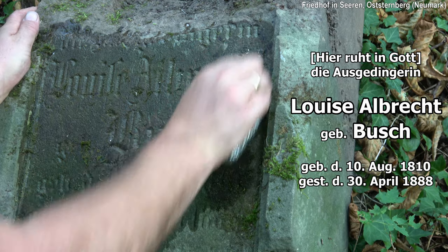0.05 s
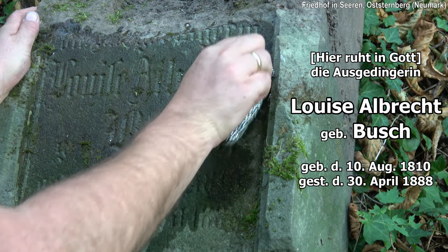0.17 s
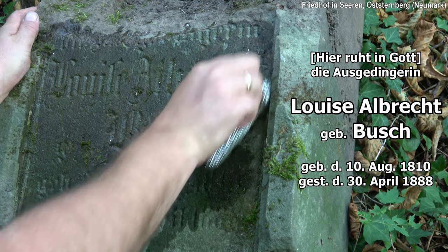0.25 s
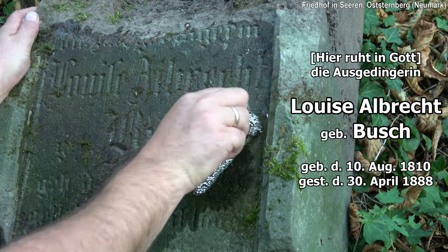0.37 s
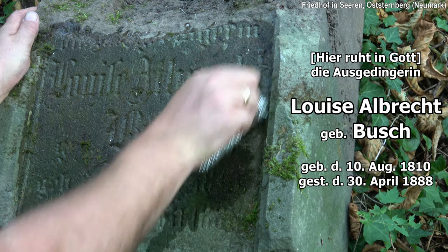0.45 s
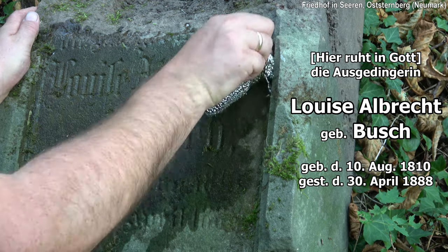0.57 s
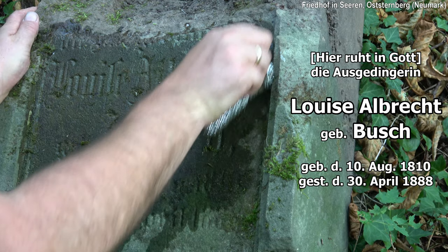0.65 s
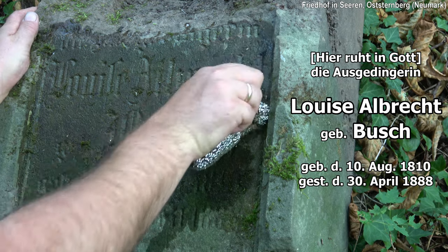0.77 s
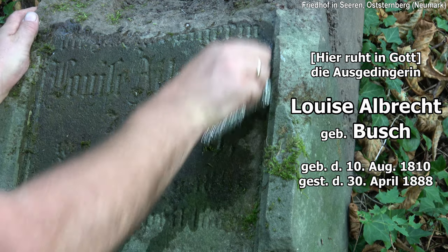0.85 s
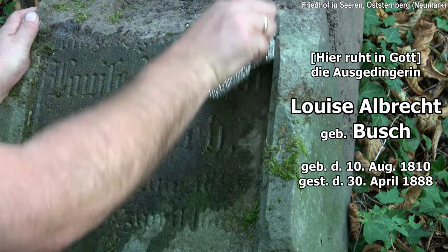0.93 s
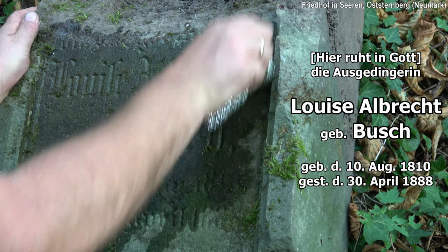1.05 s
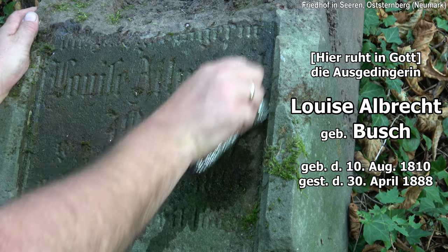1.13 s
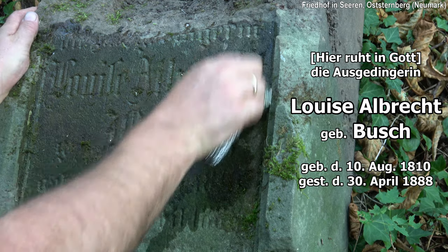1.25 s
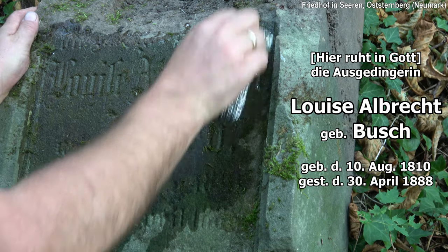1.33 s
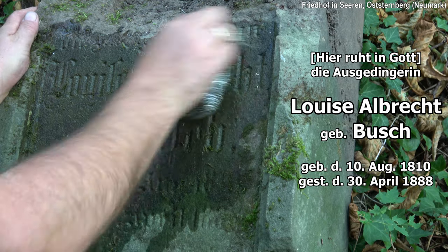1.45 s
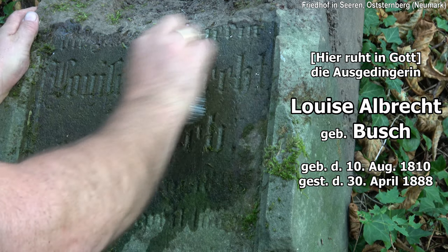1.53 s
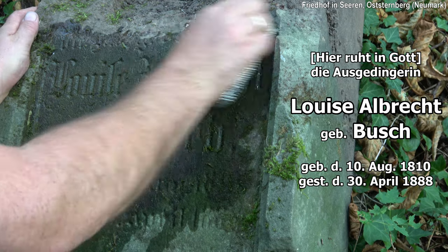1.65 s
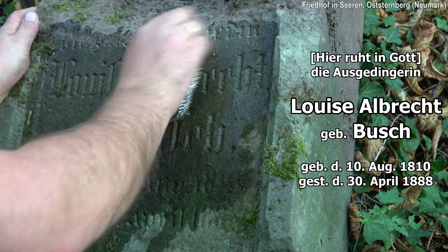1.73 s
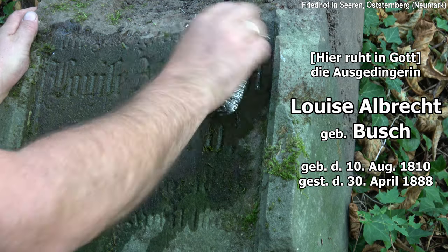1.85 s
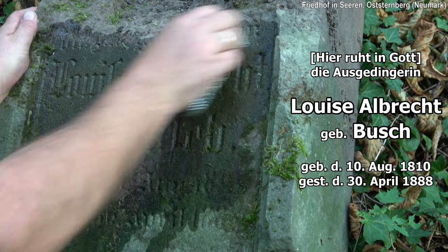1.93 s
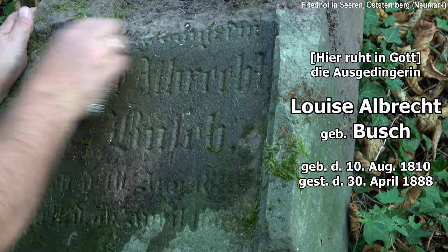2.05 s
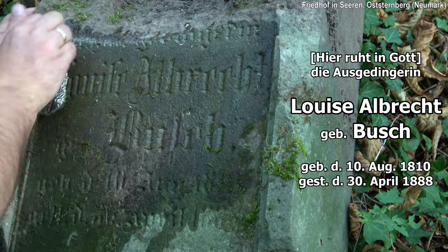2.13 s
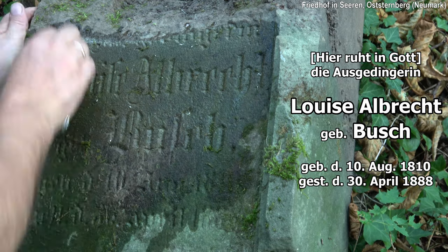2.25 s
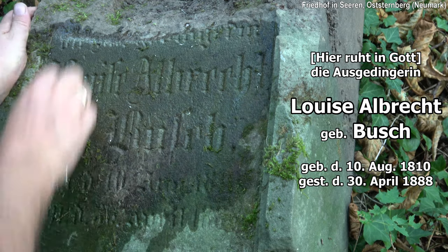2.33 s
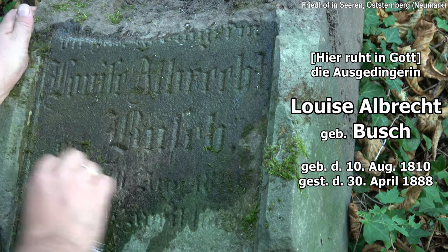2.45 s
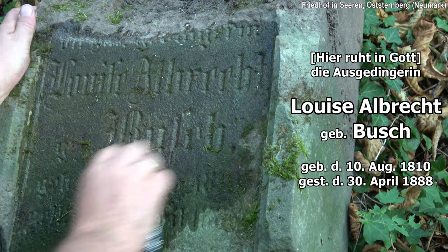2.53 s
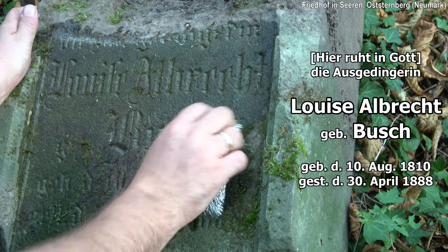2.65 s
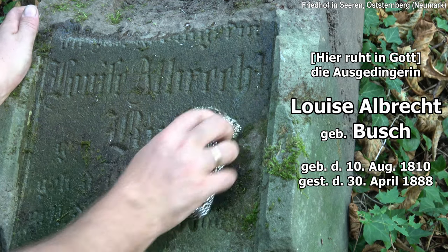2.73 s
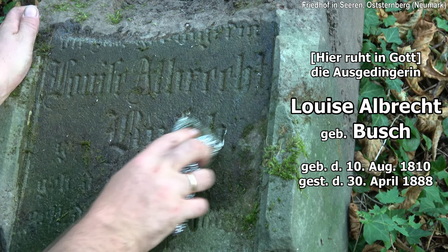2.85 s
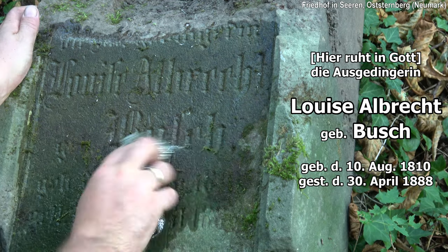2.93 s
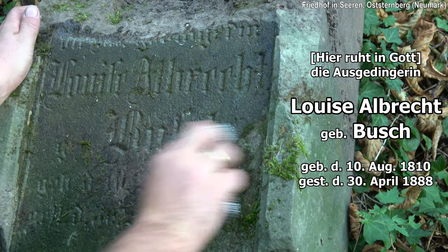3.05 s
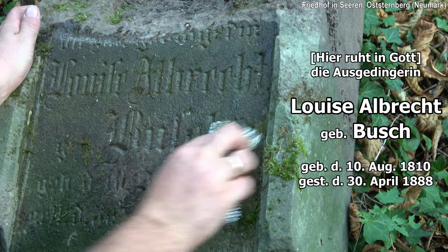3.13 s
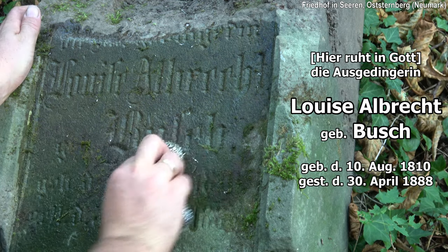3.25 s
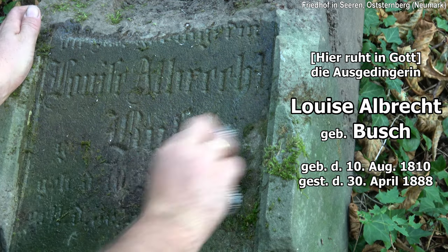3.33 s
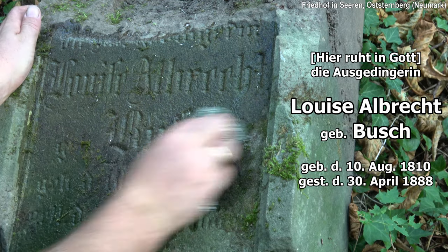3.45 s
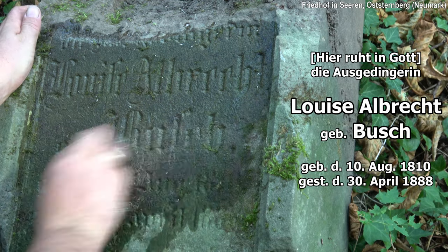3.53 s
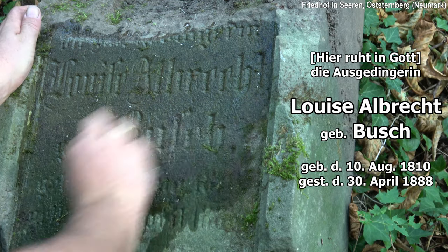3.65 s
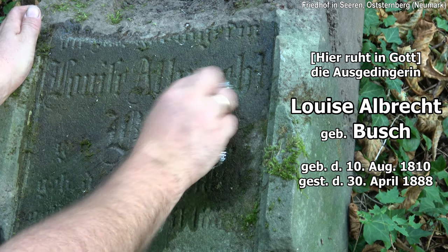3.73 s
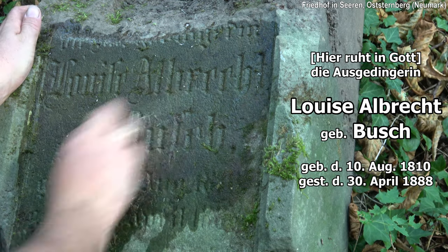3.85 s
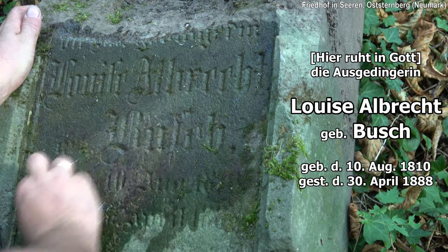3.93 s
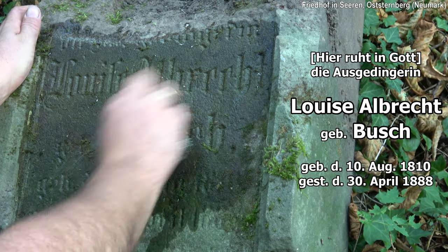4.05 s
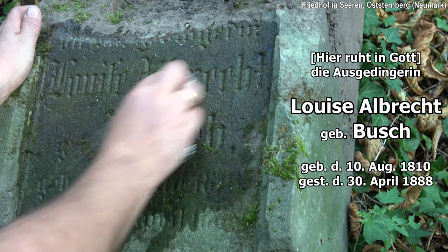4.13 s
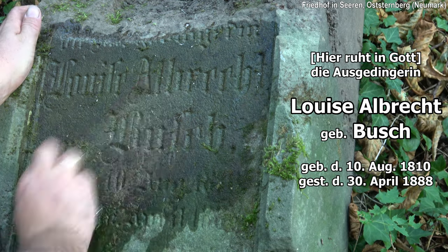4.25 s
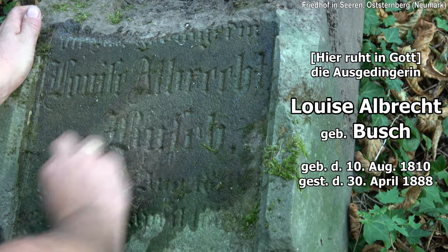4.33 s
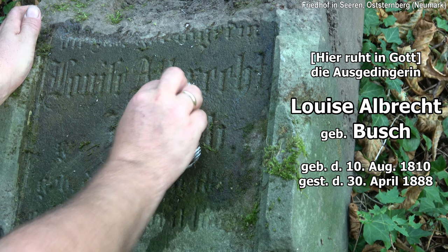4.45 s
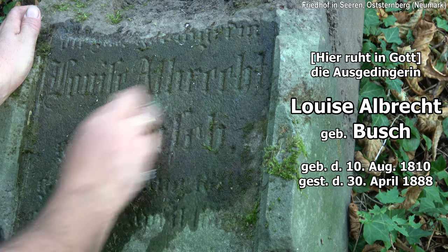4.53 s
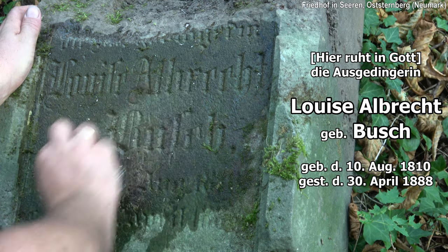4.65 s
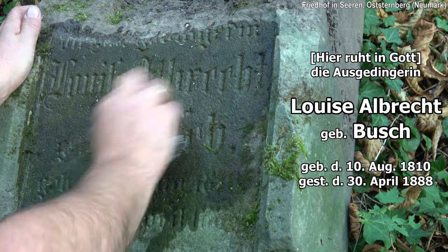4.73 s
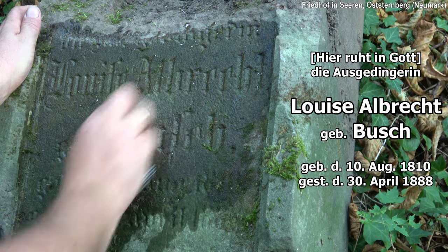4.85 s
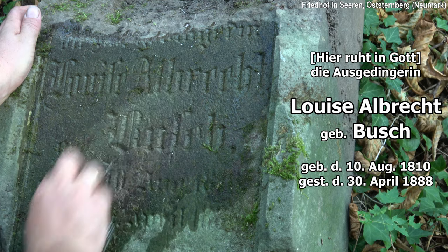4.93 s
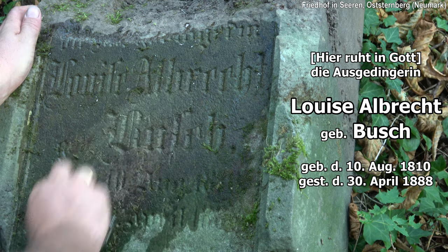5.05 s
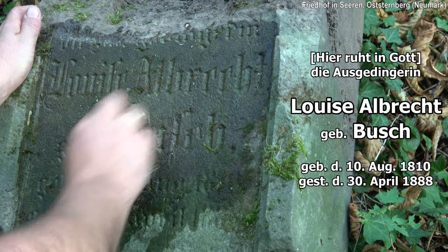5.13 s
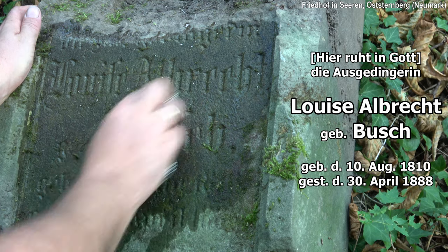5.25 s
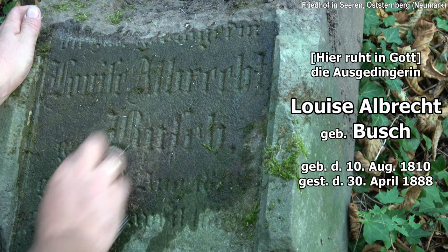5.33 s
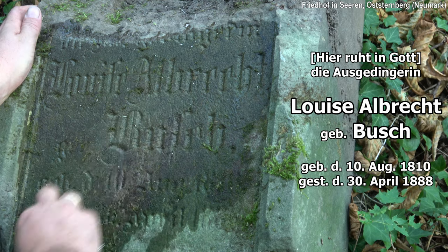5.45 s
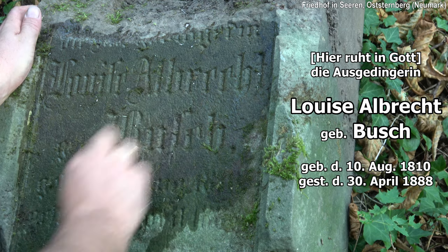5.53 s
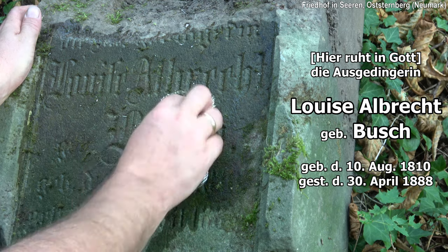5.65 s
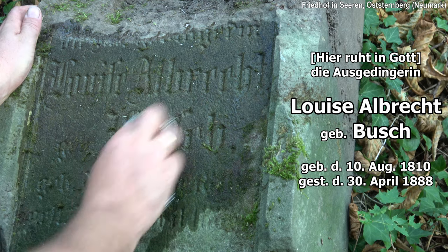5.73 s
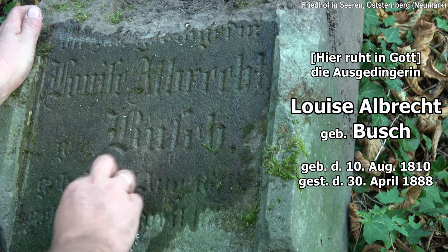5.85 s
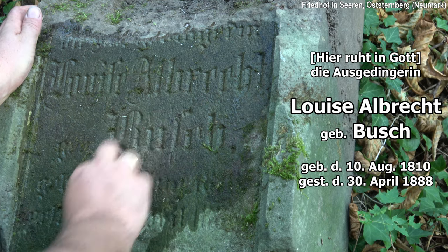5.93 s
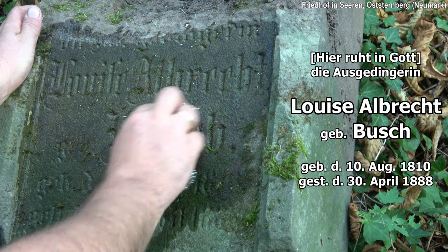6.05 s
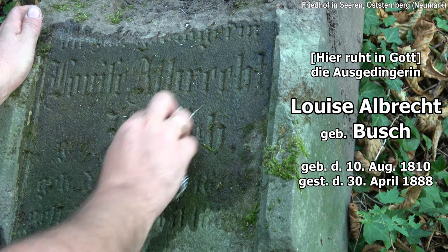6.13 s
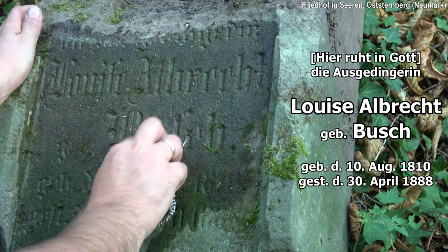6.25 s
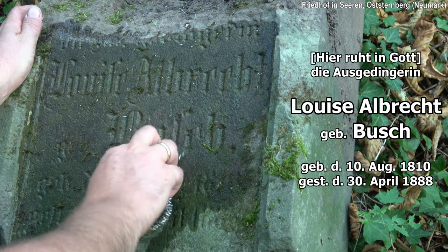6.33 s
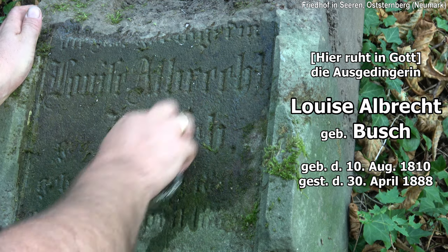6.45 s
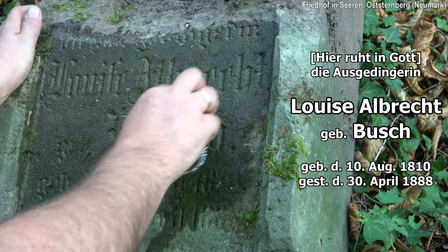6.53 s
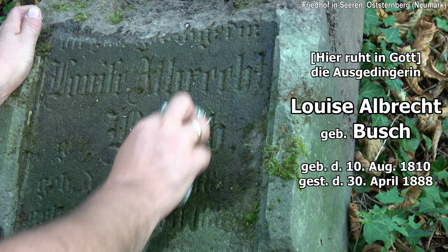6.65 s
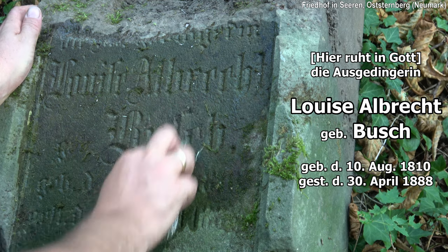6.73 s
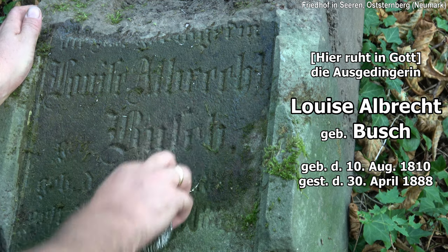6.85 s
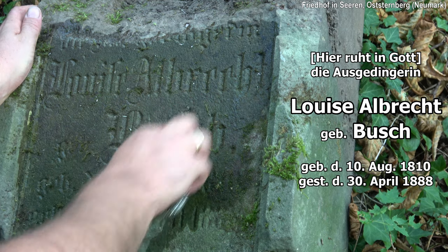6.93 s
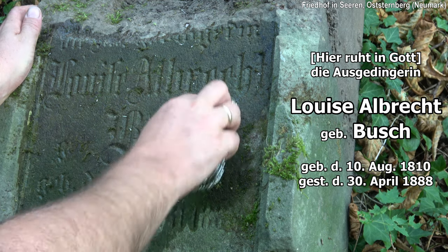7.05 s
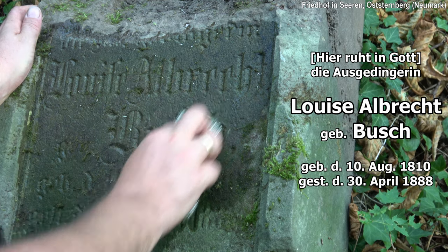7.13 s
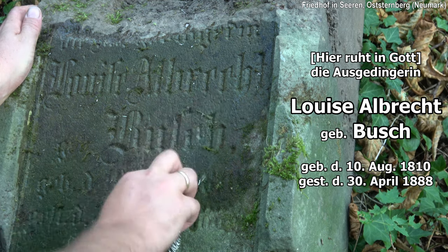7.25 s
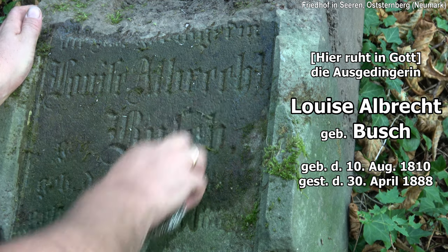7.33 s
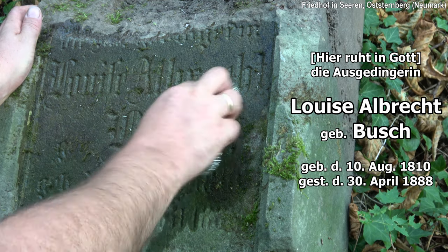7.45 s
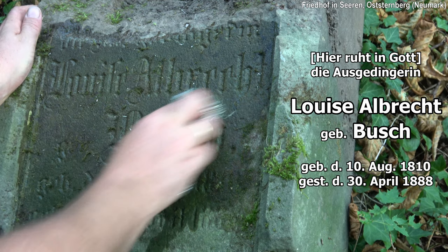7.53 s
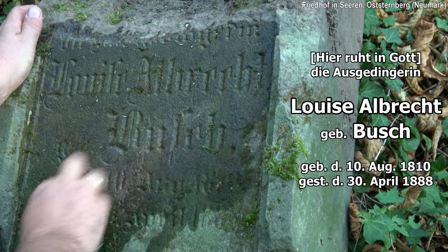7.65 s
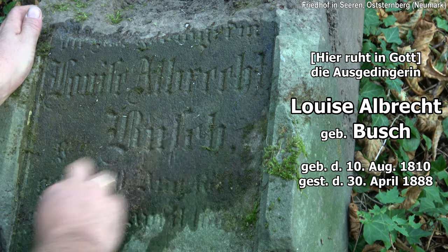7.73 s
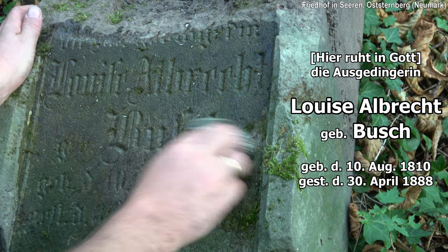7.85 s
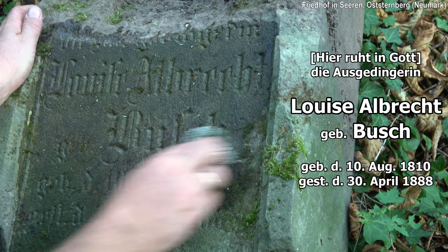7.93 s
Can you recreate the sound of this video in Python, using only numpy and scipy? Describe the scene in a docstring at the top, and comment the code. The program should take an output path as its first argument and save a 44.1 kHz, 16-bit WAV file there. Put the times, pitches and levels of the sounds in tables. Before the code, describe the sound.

A mesh pad scrubs rough stone in quick rasping strokes, then slower single ones, over a faint outdoor rumble and whirr.

```python
"""Scrubbing a stone slab

A hand scrubs a mossy slab with a mesh pad, close by, on a still day outdoors. Countless strands
catch and slip on the grit, making a rasp; a few snap free with a tick. Quick strokes come first,
a pause with a soft bump, more quick strokes, then slow single ones. Two faint whistles rise,
and a steady whirr and a low rumble lie under it all."""
import sys
import numpy as np
from scipy import signal
from scipy.fft import rfft, irfft
from scipy.io import wavfile
from scipy.ndimage import uniform_filter1d

SR = 44100
rng = np.random.default_rng(int(sys.argv[2]) if len(sys.argv) > 2 else 0)


def store_wav(level_fs):
    """Save 16-bit WAV to argv[1]."""
    pcm = np.round(np.clip(np.atleast_2d(level_fs), -1, 1) * 32767)
    wavfile.write(sys.argv[1], SR, pcm.T.astype(np.int16))


N = 351918
TIME = np.arange(N) / SR

# The tone of strands slipping on grit: pitch_hz, level_db
RASP_TONE = [(100, -38), (250, -24.5), (430, -17.5), (600, -10), (850, -6), (1400, 1), (2100, -1.64),
             (3700, -0.25), (4900, -2), (6900, -1.34), (9500, -4), (12000, -7.5), (14000, -10.5),
             (15600, -16.5)]
# Strokes of the pad: start_s, length_s, speed_up_s, slow_down_s, level_db,
# brightness_db_per_octave, palm_hollow_db, hand_shadow_db, bounce_delay_ms
PAD_STROKES = [(0.008, 0.15, 0.064, 0.056, -29, -1.6, -3, 1.5, 0.81),
               (0.146, 0.26, 0.14, 0.08, -35.0, -1.4, -0.5, 2.5, 0.38),
               (0.415, 0.2, 0.086, 0.093, -30, -0.6, -3, 2, 1.45),
               (0.614, 0.19, 0.11, 0.094, -32, -0.6, -2.5, -0.1, 1.5),
               (0.81, 0.18, 0.082, 0.077, -30.5, -0.7, -2.0, 0.7, 0.34),
               (0.994, 0.25, 0.09, 0.1, -33, -0.8, -1.4, 0.9, 0.38),
               (1.413, 0.13, 0.074, 0.044, -27.5, 0.5, 2, 2.6, 0.62),
               (1.534, 0.12, 0.057, 0.048, -29, -0.1, 2.1, 4, 1.8),
               (1.648, 0.15, 0.058, 0.055, -28, -0.1, 2, 2.5, 0.31),
               (1.783, 0.12, 0.047, 0.045, -31.5, 0.8, 4.5, 2, 2.5),
               (1.891, 0.27, 0.088, 0.041, -28, 0.4, 5.1, 2.5, 0.29),
               (2.719, 0.3, 0.32, 0.074, -31, 1.2, 1, 1.5, 1.27),
               (2.986, 0.16, 0.064, 0.059, -30.5, 1.8, 5, 1, 0.43),
               (3.133, 0.17, 0.092, 0.081, -29.7, -0.5, 2.5, 2, 0.4),
               (3.279, 0.16, 0.08, 0.073, -31, 0.2, 1, 2, 1.33),
               (3.43, 0.2, 0.074, 0.086, -26, 0.4, 0.7, -0.6, 0.99),
               (3.61, 0.18, 0.072, 0.057, -27.9, 0.4, 2, 2.5, 0.37),
               (3.784, 0.19, 0.048, 0.078, -26.5, -0.5, -2.7, 1.3, 0.56),
               (3.949, 0.19, 0.084, 0.047, -29.5, 0, -0.5, 2.5, 2.1),
               (4.134, 0.2, 0.068, 0.077, -27.5, -0.56, -3.5, 1.5, 2.8),
               (4.303, 0.19, 0.079, 0.058, -28, 0, 1.5, 2, 0.39),
               (4.49, 0.17, 0.078, 0.055, -27, 0, -1.3, 0.7, 1.55),
               (4.642, 0.17, 0.092, 0.047, -28, -0.3, 0.2, 1, 0.4),
               (4.804, 0.27, 0.066, 0.16, -28, -1.0, -3, 0.1, 0.48),
               (5.253, 0.245, 0.056, 0.16, -29, -0.2, -2.2, 0, 2.2),
               (5.686, 0.27, 0.049, 0.2, -31, -0.7, -1, 3.5, 1.13),
               (6.108, 0.23, 0.13, 0.097, -37.5, -0.6, 1.5, 5.5, 1.16),
               (6.219, 0.24, 0.1, 0.071, -41.5, 0, -2, 6, 0.41),
               (6.601, 0.33, 0.13, 0.23, -32.5, -0.1, 2.8, 8, 0.43),
               (7.102, 0.28, 0.069, 0.26, -31.5, 0.2, 2, 7.5, 0.44),
               (7.516, 0.231, 0.061, 0.142, -27.5, 0.26, -3, 4, 0.69),
               (7.918, 0.24, 0.057, 0.14, -28.5, -0.5, 0.5, 0, 1)]


def gain_of(db):
    """Turns decibels into a number to multiply by."""
    return 10 ** (np.asarray(db) / 20)


def evened(x):
    """Scales a signal to an average power of 1."""
    return x / np.sqrt(np.mean(x ** 2) + 1e-20)


def read(points, hz):
    """Reads between a table's points, on a scale of octaves."""
    pitch_hz, value = np.transpose(points)
    return np.interp(np.log(hz + 1), np.log(pitch_hz + 1), value)


def coloured(x, db_at):
    """Filters x by a rule that gives dB for each frequency."""
    return irfft(rfft(x) * gain_of(db_at(np.fft.rfftfreq(N, 1 / SR))), N)


def wander(rate_hz):
    """A smooth random wobble of size 1, mostly slower than the rate."""
    return evened(coloured(rng.standard_normal(N), lambda hz: -10 * np.log10(1 + (hz / rate_hz) ** 4)))


def hump(hz, centre_hz, octaves):
    """A bell shape of height 1 around one pitch."""
    return np.exp(-(np.log2((hz + 1) / centre_hz) / octaves) ** 2)


def add(mix, start_s, sound):
    """Mixes a sound in at the given time."""
    part = mix[max(round(start_s * SR), 0):][:len(sound)]
    part += sound[:len(part)]


def arm_swing(start, length, rise_s, fall_s):
    """One move of the arm, from 0 to 1: it speeds up, then slows to a stop."""
    up = np.clip((TIME - start) / rise_s, 0, 1)
    down = np.clip((start + length - TIME) / fall_s, 0, 1)
    return (np.sin(np.pi / 2 * up) * np.sin(np.pi / 2 * down)) ** 2


def rub_strength(sag_db=1.0, drag_db=-28.5, fade_db_per_s=500):
    """Pressure eases through each stroke, and the mesh drags faintly as the hand turns round."""
    # Light touches as the pad is shifted or set down: start_s, length_s, level_db
    brushes = [(0, 0.031, -50), (1.214, 0.067, -53.4), (2.132, 0.088, -50), (2.188, 0.083, -44.5),
               (2.469, 0.13, -50.4), (2.632, 0.088, -54.5), (5.037, 0.075, -51), (5.188, 0.06, -50.5),
               (5.467, 0.054, -50.5), (5.638, 0.042, -55), (5.922, 0.047, -56.1), (7.876, 0.04, -56)]
    power = np.zeros(N)
    for start, length, rise_s, fall_s, db, *_ in PAD_STROKES:
        inside = np.clip(TIME, start, start + length)
        run = arm_swing(start, length, rise_s, fall_s) * gain_of(db - sag_db * (inside - start) / length)
        drag = gain_of(db + drag_db - np.minimum(fade_db_per_s * abs(TIME - inside), 80))
        power += run ** 2 + drag ** 2
    for start, length, db in brushes:
        power += (gain_of(db) * arm_swing(start, length, length / 2, length / 2)) ** 2
    return np.sqrt(power)


def slips(speed, slow_per_s=6000, extra_per_s=50000, spread_db=0.3):
    """Strands make tiny, uneven slips; the faster the pad runs, the denser the hiss."""
    chance = np.clip((slow_per_s + extra_per_s * speed) / SR, 1e-3, 1)
    size = rng.standard_normal(N) * gain_of(spread_db * np.minimum(rng.exponential(1, N), 4))
    return evened(size * (rng.random(N) < chance) / np.sqrt(chance))


def under_hand(x, speed, ease_db_per_octave_s=3.5, bite_db=1.5, patchy_db=1.7,
               bounce_share=0.26, bounce_dull_hz=4500, glide_per_s=0.14):
    """The palm, the mesh and a close echo shape the rasp, a little differently in each stroke."""
    # The hand shifts its hold and place: time_s, mesh_ring_db, shadow_hz, left_minus_right_db
    holds = [(0, 2.5, 4450, -1.9), (1.6, .8, 4750, 0.2), (2.05, -2.4, 4560, 0.1), (3.0, 1.5, 5100, -0.2),
             (3.8, -1.2, 4400, 1), (5.0, 0.5, 4750, 1.2), (6.2, 0.8, 4550, 0.2), (6.8, 1.5, 5040, -0.2),
             (7.98, .8, 5100, 0.8)]
    # Moments when the cupped hand rings: start_s, end_s, pitch_hz, width_octaves, boost_db
    cupped_rings = [(3.14, 3.294, 3660, 0.22, 5.5), (5.68, 6.5, 1810, .16, 2), (6.6, 7.4, 2420, .1, 4.5)]
    hz, t, slices = signal.stft(x, SR, nperseg=512, noverlap=384)
    hz = hz[:, None]
    start, length, _, _, _, *grip = np.transpose(PAD_STROKES)
    middle = start + length / 2
    stroke = np.argmin(abs(t[:, None] - middle) - length / 2, axis=1)  # nearest to each moment
    from_middle_s = t - middle[stroke]
    bright, hollow, shadow, delay_ms = (uniform_filter1d(column[stroke], size=15) for column in grip)
    hold_s, *hold = np.transpose(holds)
    mesh, shadow_hz, pan = (np.interp(t, hold_s, column) for column in hold)
    # a stroke starts dark and brightens as the pressure eases
    bright = bright + ease_db_per_octave_s * from_middle_s
    db = read(RASP_TONE, hz) + bright * np.log2(np.maximum(hz, 700) / 4000)
    db += hollow * hump(hz, centre_hz=1320, octaves=0.33)
    db += mesh * hump(hz, centre_hz=7400, octaves=0.59)
    db -= shadow * np.exp(-((hz - shadow_hz) / 880) ** 2)  # the hand blocks a band of treble
    # the middle of the rasp swells above 86% of full speed
    db += bite_db * (np.interp(t, TIME, speed) - 0.86) * hump(hz, centre_hz=2200, octaves=1.1)
    for begin, end, ring_hz, octaves, ring_db in cupped_rings:
        db += ring_db * hump(hz, ring_hz, octaves) * ((t > begin) & (t < end))
    # strands come into play and drop out in bunches
    bunches = uniform_filter1d(rng.standard_normal(db.shape), size=5, axis=0)
    db += patchy_db * evened(uniform_filter1d(bunches, size=12, axis=1))
    # sound bounces between hand and stone, on a path that changes as the hand travels
    delay_s = delay_ms / 1000 * (1 + glide_per_s * from_middle_s)
    bounce = bounce_share * np.exp(-hz / bounce_dull_hz - 2j * np.pi * hz * delay_s)
    colour = gain_of(db) / abs(1 - bounce)
    colour /= np.sqrt(np.mean(colour ** 2, axis=0))  # change the tone but keep the power
    slices = slices * colour * gain_of(np.array([pan, -pan]) / 2)[:, None]
    return evened(signal.istft(slices, SR, nperseg=512, noverlap=384)[1][:, :N])


def pad(boost_db=0.17, chatter_db=0.82):
    """The pad rasps over the stone and chatters across its grooves."""
    # Sound that reaches left and right by different paths: pitch_hz, level_against_direct_db
    scatter = [(700, -35.5), (1100, -30), (1700, -16), (3400, -77), (5000, -30), (8000, -21.5),
               (13000, -18)]
    strength = rub_strength()
    speed = np.sqrt(strength / strength.max())
    direct = slips(speed)
    scattered = coloured(rng.standard_normal(N), lambda hz: read(scatter, hz))
    rasp = under_hand(np.array([direct + scattered, direct - scattered]), speed)
    return rasp * strength * gain_of(boost_db + chatter_db * wander(rate_hz=70))


def background(air_db=-51, waver_db=0.45):
    """Low outdoor rumble, thin hiss and a steady whirr of three fuzzy tones."""
    # The tone of the outdoor air: pitch_hz, level_db
    air_tone = [(15, -40), (28, -9.5), (48, -5.5), (80, -2.5), (160, -14), (200, -14), (250, -14.5),
                (320, -13), (550, -2.5), (680, -6.5), (800, -3.5), (1080, -8), (1450, -20.5), (4000, -27),
                (10000, -29), (15600, -36)]
    # How alike the air sounds left and right: pitch_hz, likeness (0 to 1)
    air_likeness = [(60, 1), (200, 0.77), (640, 0.94), (3000, 0.95), (7000, 0.61), (15000, 0.38)]
    # The tones of the whirr: pitch_hz, width_hz, level_db
    whirr_tones = [(776, 79, -56), (927, 59, -67), (553, 130, -68)]
    hz = np.fft.rfftfreq(N, 1 / SR)
    left, other = rfft(rng.standard_normal((2, N)))
    alike = read(air_likeness, hz)
    right = alike * left + np.sqrt(1 - alike ** 2) * other
    air = irfft(np.array([left, right]) * gain_of(read(air_tone, hz)), N)
    whirr = np.zeros(N)
    for pitch_hz, width_hz, db in whirr_tones:
        phase = 2 * np.pi * pitch_hz * TIME
        fuzzy_tone = wander(width_hz / 2) * np.cos(phase) + wander(width_hz / 2) * np.sin(phase)
        whirr += gain_of(db) * evened(fuzzy_tone)
    return (gain_of(air_db) * evened(air) + whirr) * gain_of(waver_db * wander(rate_hz=23))


def whistles():
    """A thin tone slides upward and fades."""
    # Faint, high whistles: start_s, length_s, from_hz, to_hz, level_db
    slides = [(1.31, .12, 11300, 14100, -73), (7.83, .07, 11300, 14200, -76)]
    out = np.zeros(N)
    for start, length, from_hz, to_hz, db in slides:
        hz = np.linspace(from_hz, to_hz, int(length * SR))
        tone = np.sin(2 * np.pi * np.cumsum(hz) / SR)
        add(out, start, gain_of(db) * tone * signal.windows.tukey(len(hz), 0.5))
    return out


def bumps(rise_s=0.0046, dull_hz=420):
    """A soft blow swells and dies quickly, leaving a low murmur."""
    # Dull blows: start_s, level_db, pitch_hz, fade_s (time to fall by 60 dB)
    blows = [(2.201, -24, 268, 0.033), (2.2416, -37, 224, 0.05)]
    # The tones in each blow: pitch_multiple, boost_db, fade_multiple
    body_tones = [(1, 5.5, 0.77), (.75, -9, 2.8), (.45, -14, 3.5)]
    out, t = np.zeros(N), np.arange(SR // 4) / SR
    swell = 1 - np.exp(-(t / rise_s * 2) ** 2)
    for start, db, hz, fade_s in blows:
        ring = sum(gain_of(db + boost - 60 * t / (fade_s * longer)) * np.sin(2 * np.pi * hz * ratio * t)
                   for ratio, boost, longer in body_tones)
        add(out, start, -ring * swell)
    return coloured(out, lambda hz: -10 * np.log10(1 + (hz / dull_hz) ** 10))


def snaps(ring_s=0.001, focus_db=14):
    """A caught strand lets go with a dry tick."""
    # Single strands snapping free: start_s, peak_db, pitch_hz
    strands = [(2.401, -38, 2400), (2.411, -42, 2200), (2.76, -45, 9000), (5.574, -52, 1600),
               (6.439, -42, 3400), (6.85, -31, 6540), (7.154, -25.5, 4000)]
    out, t, hz = np.zeros(N), np.arange(1024) / SR, np.fft.rfftfreq(1024, 1 / SR)
    shape = np.exp(-t / ring_s) * (1 - np.exp(-(t / ring_s * 2) ** 2))
    for start, db, pitch_hz in strands:
        burst = rng.standard_normal(len(t)) * shape
        tone_db = read(RASP_TONE, hz) + focus_db * hump(hz, pitch_hz, octaves=0.54)
        tick = irfft(rfft(burst) * gain_of(tone_db))
        add(out, start, gain_of(db) * tick / abs(tick).max() * (1 - t / t[-1]))
    return out


def scene():
    """All the sounds together, in stereo."""
    return pad() + snaps() + bumps() + whistles() + background()


def record(dry, top_hz=15780):
    """The microphone pair leans left in the low middle pitches and loses the highest treble."""
    # How much louder the left side is: pitch_hz, left_minus_right_db
    left_lean = [(60, 0.5), (200, 1), (380, 6), (700, 8.5), (1290, 1.5), (2400, 0.5), (4400, -0.3),
                 (15000, 1.5)]
    lean = gain_of(read(left_lean, np.fft.rfftfreq(N, 1 / SR)))
    left_right = np.array([2 * lean, np.full_like(lean, 2)]) / (1 + lean)
    heard = irfft(rfft(dry) * left_right, N)
    treble_cut = signal.firwin(511, top_hz, window=("kaiser", 9), fs=SR)
    return signal.oaconvolve(heard, treble_cut[None], "same")


dry = scene()
out = record(dry)
store_wav(out)
```